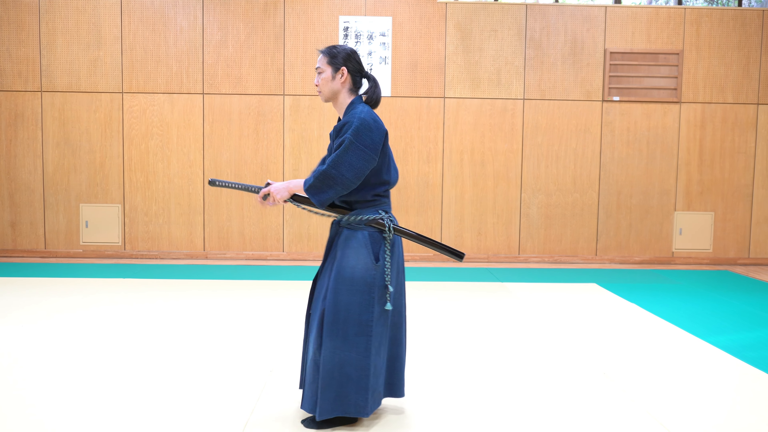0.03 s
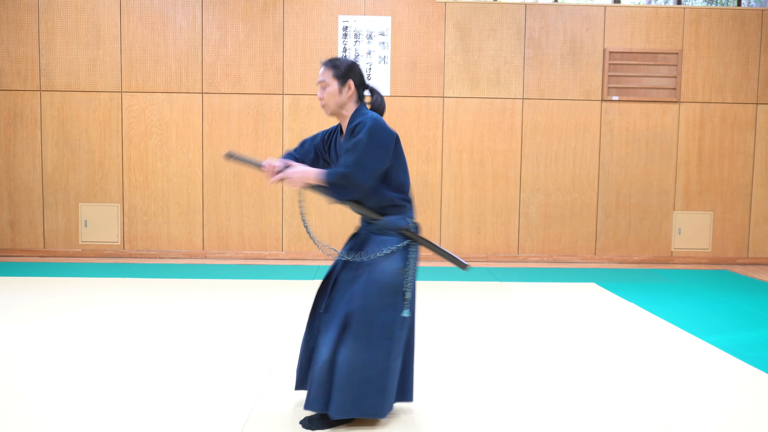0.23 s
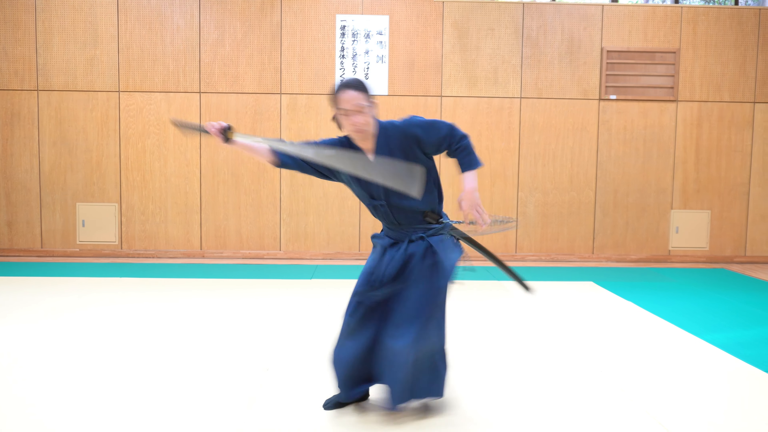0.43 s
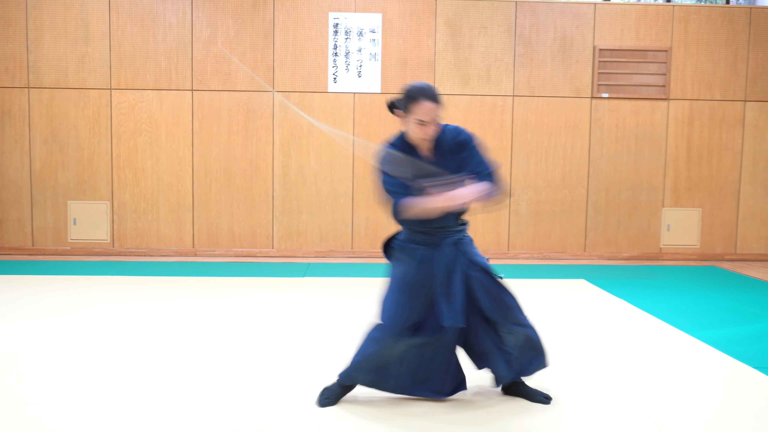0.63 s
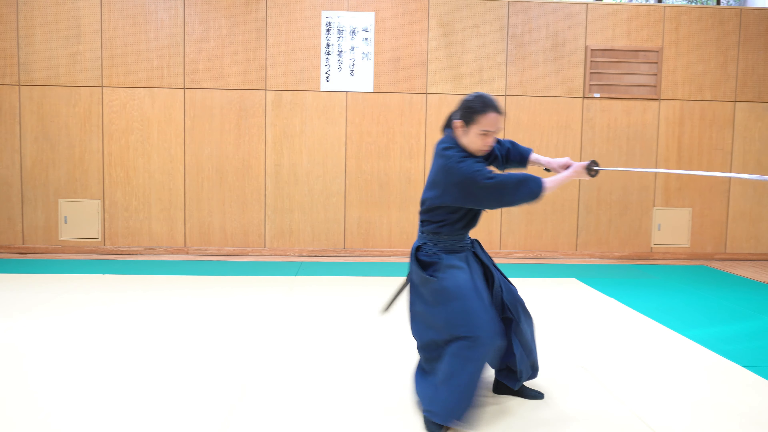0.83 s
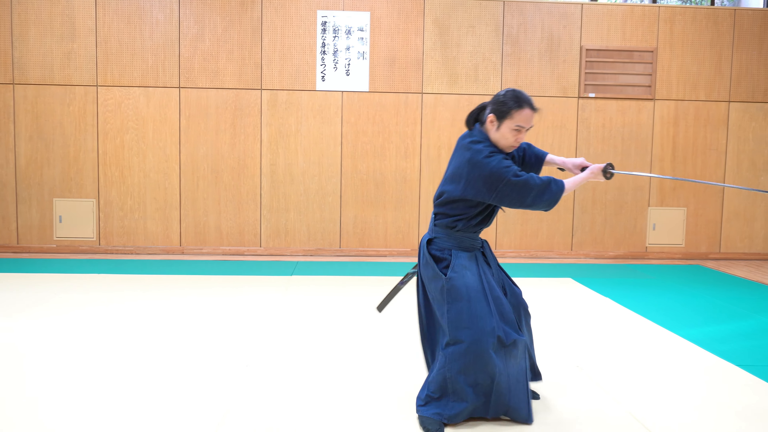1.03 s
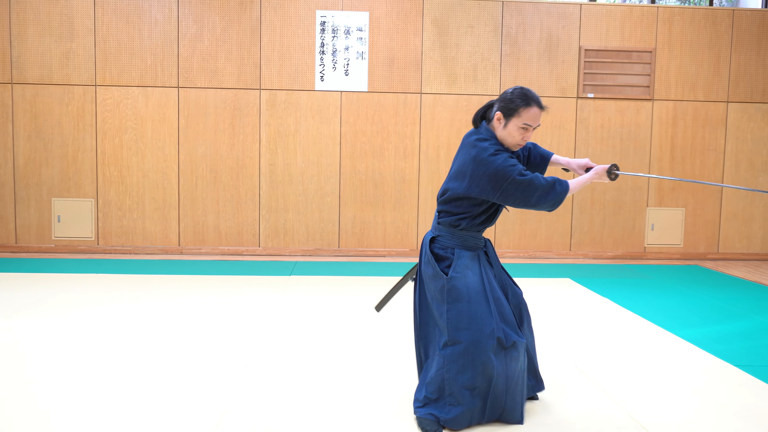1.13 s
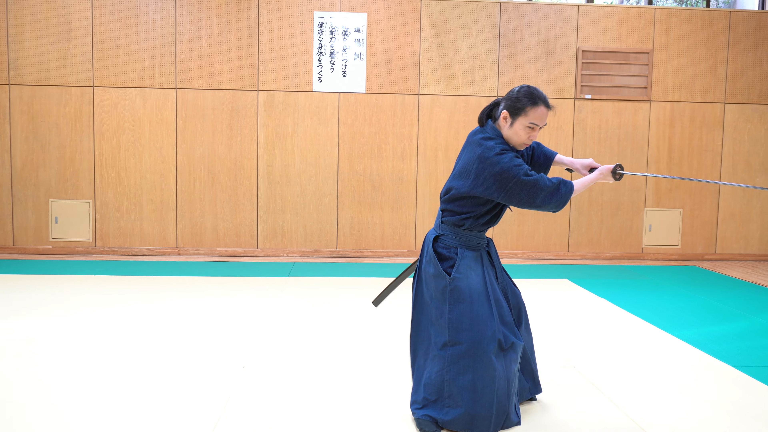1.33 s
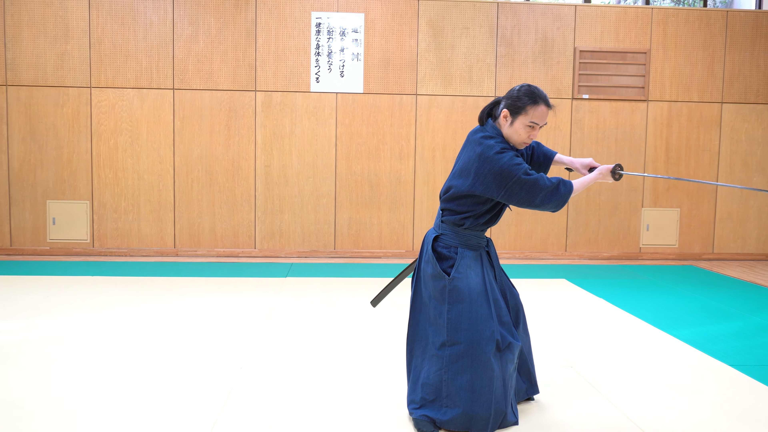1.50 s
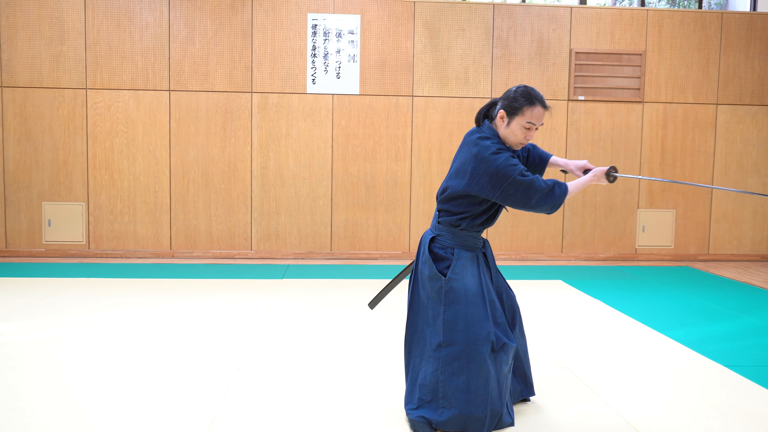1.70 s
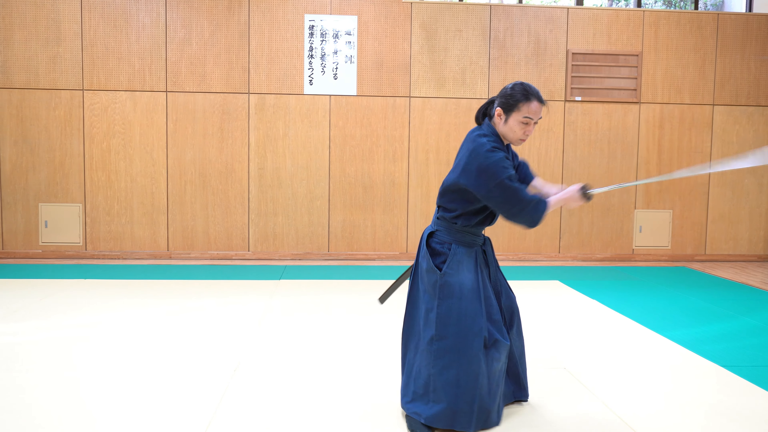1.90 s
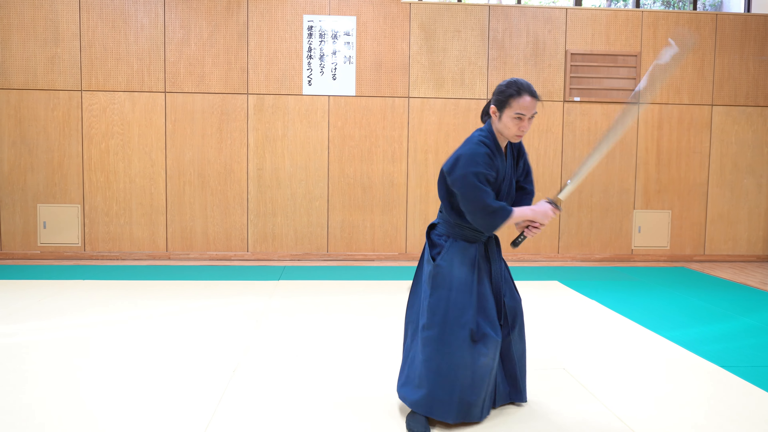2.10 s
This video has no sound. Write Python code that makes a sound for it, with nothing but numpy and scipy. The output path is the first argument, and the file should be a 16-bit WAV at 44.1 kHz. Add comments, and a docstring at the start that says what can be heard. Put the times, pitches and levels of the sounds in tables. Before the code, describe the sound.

A sword is drawn with quick clacks and a scrape, then swishes through the air. Feet thud and skid on a mat while heavy clothing sweeps round and settles, leaving the steady ventilation hum of a slightly echoing hall.

```python
"""Ventilation hums steadily in a quiet hall. A sword is drawn: its fittings click, and the blade clacks
and scrapes, exciting the resonances of steel and wooden scabbard. Feet begin to thud on the sprung floor.
The freed blade rings faintly and swishes once, while the emptying scabbard sounds a falling tone.
With sharp slaps the person turns: a foot skids on the mat, and heavy cloth sweeps round and settles.
The hall reverberates for about a second."""
import sys
import numpy as np
from scipy import signal
from scipy.fft import rfft, irfft, next_fast_len
from scipy.io import wavfile
from scipy.ndimage import map_coordinates

SR = 44100
rng = np.random.default_rng(int(sys.argv[2]) if len(sys.argv) > 2 else 0)


def bounce(signal):
    """Save signal as a 16-bit WAV file at the path given by the first command-line argument."""
    frames = np.transpose(np.atleast_2d(signal))
    limited = np.clip(frames, -1, 1)
    pcm = np.round(limited * 32767).astype(np.int16)
    wavfile.write(sys.argv[1], SR, pcm)


N = 94815
T = np.arange(N) / SR


def amp(db):
    """Decibels to amplitude ratio."""
    return 10 ** (np.asarray(db) / 20)


def unit(x):
    """Normalisation to rms 1."""
    return x / np.sqrt(np.mean(x ** 2) + 1e-20)


def along(points, hz):
    """Interpolation of (Hz, value) points on a logarithmic frequency axis."""
    freqs, values = np.transpose(points)
    return np.interp(np.log(hz + 1), np.log(freqs + 1), values)


def wobble(rate):
    """Smooth random modulation, with rate knots a second."""
    return map_coordinates(rng.standard_normal(int(N * rate / SR) + 4), [T * rate])


def filtered(x, response):
    """Linear filtering: the spectrum is multiplied by a frequency response."""
    size = x.shape[-1]
    padded = 2 * next_fast_len(size)
    return irfft(rfft(x, padded) * response(np.fft.rfftfreq(padded, 1 / SR)), padded)[..., :size]


def minimum_phase(tone):
    """Folding the cepstrum gives a causal response with the given spectrum."""
    def response(hz):
        cepstrum = irfft(np.log(amp(along(tone, hz))))
        size = len(cepstrum)
        return np.exp(rfft(np.r_[cepstrum[0], 2 * cepstrum[1:size // 2]], size))
    return response


def resonator(modes):
    """Modal superposition: a body responds as a sum of damped resonances."""
    return lambda f: sum(amp(db) * 1j * f * width / (hz * hz - f * f + 1j * f * width)
                         for hz, width, db in modes)


def noise(tone):
    """Spectral shaping of two independent white noises."""
    return unit(filtered(rng.standard_normal((2, N)), lambda hz: amp(along(tone, hz))))


def spread(pair, correlation):
    """Mid-side mixing gives two independent signals a set left-right correlation."""
    def weights(hz):
        angle = np.arccos(np.clip(along(correlation, hz), -1, 1)) / 2
        return np.array([np.cos(angle), np.sin(angle)])
    mid, side = filtered(pair, weights)
    return np.array([mid + side, mid - side])


# Direct sound. Each row: frequency in Hz, left-right correlation.
DIRECT_FIELD = [(250, 1), (700, 0.99), (2000, 0.91), (5000, 0.56), (15000, 0.66)]
def near(pair):
    """Direct sound is much alike on both sides, so its image is narrow."""
    return spread(pair, DIRECT_FIELD)


def swell(rows):
    """Incoherent addition: the envelopes of the movements sum in power."""
    power = 0
    for s, db, rise, fall in rows:
        decay = np.where(T < s, ((T - s) / rise) ** 2, np.abs((T - s) / fall) ** 1.8)
        power += amp(db) ** 2 * np.exp(-2 * decay)
    return np.sqrt(power)


def strokes(rows, tone, grain_db):
    """Amplitude modulation: noise follows the movements, with a fast flutter as its grain."""
    return near(swell(rows) * unit(noise(tone) * amp(grain_db * wobble(300))))


# Diffuse sound. Each row: frequency in Hz, left-right correlation.
DIFFUSE_FIELD = [(60, .9999), (150, 1), (380, 0.98), (950, 0.76), (2400, 0.24), (6000, 0.067),
                 (15000, 0.24)]
# Decay of the hall. Each row: frequency in Hz, reverberation time in seconds.
HALL_T60 = [(100, 1), (500, 0.62), (2000, 1), (4000, 0.84), (8000, 0.55), (15000, 0.45)]
# Colour of its tail. Each row: frequency in Hz, gain in dB.
HALL_SPECTRUM = [(100, 4), (600, 4.5), (2000, 0), (5000, -4.5), (10000, -3.5), (16000, 4.5)]
def in_hall(x, wet_db, build_s=0.0091):
    """Reverberation: a diffuse tail builds up and decays exponentially, the treble first."""
    hz, t, spectra = signal.stft(rng.standard_normal((2, SR)), SR, nperseg=256)
    decay = amp(along(HALL_SPECTRUM, hz)[:, None] - 60 * t / along(HALL_T60, hz)[:, None])
    onset = 1 - np.exp(-t / build_s)
    tail = spread(signal.istft(spectra * decay * onset, SR, nperseg=256)[1], DIFFUSE_FIELD)
    tail /= np.linalg.norm(tail[0])
    return x + amp(wet_db) * signal.fftconvolve(x.mean(0)[None], tail, axes=1)[:, :N]


# Moving air. Each row: frequency in Hz, relative level in dB.
AIR_SPECTRUM = [(10, -39), (25, -16), (40, 3), (60, -4.5), (90, 0.5), (135, -0.5), (160, -7.5), (200, -3),
                (320, -6), (450, -3.5), (720, -7), (950, -10.5), (1400, -14), (2000, -18.5), (3300, -29),
                (4600, -37), (8000, -43), (15800, -47.5)]
# Fan tones. Each row: frequency in Hz, rms level in dB.
FAN_TONES = [(96.9, -54.5), (192.5, -51.5), (425.3, -54.5), (502, -52)]
def ventilation(air_db=-38):
    """Dull broadband air noise forms a diffuse field; the fan tones waver in phase."""
    hum = sum(amp(db) * np.sqrt(2) * np.sin(2 * np.pi * hz * T + 0.65 * wobble(6.95))
              for hz, db in FAN_TONES)
    return amp(air_db) * spread(noise(AIR_SPECTRUM), DIFFUSE_FIELD) + hum


# Blade rubbing in the scabbard's mouth. Each row: time in seconds, level in dB.
SCRAPE_LEVELS = [(.24, -31), (.262, -33.5), (.31, -31), (.35, -32.5), (.37, -33.5), (.41, -28.5),
                 (.445, -28), (.49, -29.5), (.53, -29.5), (.56, -33), (.585, -31.5), (.61, -41), (.65, -38),
                 (.68, -83)]
# Its friction. Each row: frequency in Hz, relative level in dB.
SCRAPE_SPECTRUM = [(150, -8), (300, 0), (420, -9.5), (620, -3), (850, -2), (1300, -1.5), (1800, -3),
                   (2400, -2.5), (4000, -6.5), (7000, -16.5), (10000, -25), (16000, -36)]
# Scabbard resonances. Each row: frequency in Hz, bandwidth in Hz, gain in dB.
SCABBARD_MODES = [(690, 160, -11.5), (1219, 69, 0), (1420, 98, -8), (1610, 79, -5), (1836, 75, 4.5),
                  (2080, 70, -1.5), (2272, 71, 1), (2653, 65, -1), (3070, 66, -2), (3565, 33, -1.5),
                  (4645, 43, -10), (5180, 40, -22)]
def scrape(ring_db=-19.5):
    """Sliding friction makes grainy noise that weakly drives the scabbard's modes."""
    level = amp(np.interp(T, *np.transpose(SCRAPE_LEVELS), left=-120, right=-120))
    friction = noise(SCRAPE_SPECTRUM) * amp(1.8 * wobble(400))
    ring = unit(filtered(friction, resonator(SCABBARD_MODES)))
    return level * near(unit(friction) + amp(ring_db) * ring)


def chatter(envelope, first_contact_db=12.5):
    """Broadband excitation: an impulse at first contact, then a brief rattle."""
    force = envelope * rng.standard_normal((2, len(envelope)))
    force[0, 0] += amp(first_contact_db)
    for _ in range(4):  # flatten the spectrum, then confine it in time again
        spectrum = rfft(force)
        force = irfft(spectrum / (np.abs(spectrum) + 1e-12), len(envelope)) * np.sqrt(envelope)
    return near(force)


# Resonances of scabbard mouth and steel fittings. Each row: frequency in Hz, bandwidth in Hz, gain in dB.
MOUTH_MODES = [(995, 80, -15.5), (1778, 80, -1.5), (4800, 92, -19)]
STEEL_MODES = [(2020, 230, 1), (2270, 230, 6), (2670, 220, 5), (3570, 82, -4), (3900, 100, -10),
               (5070, 200, 4.5), (5630, 140, -14), (7100, 120, -20), (7500, 96, -12), (9000, 100, -17),
               (10550, 110, -29)]
# Crack of contact. Each row: frequency in Hz, relative level in dB.
CRACK_SPECTRUM = [(100, -16), (350, 1.5), (750, 8), (1300, 4.5), (2500, -2), (5000, 0.5), (8500, -8.5),
                  (11000, -28), (16000, 1)]
# Knocks of blade and fittings. Each row: start in seconds, level in dB, chatter length in seconds,
# gains of scabbard, mouth, steel and crack in dB, left minus right in dB.
KNOCKS = [(0.2407, -28, 0.0016, -18, -11, -8, 0, 0), (.2484, -20.5, 0.0013, -8, -14, -8, -4.5, 0),
          (0.252, -27.5, 0.0058, -8, -14, -13, 0, 0), (0.283, -19, 0.00307, -10.5, -21, -8, -5.5, 0.5),
          (0.2892, -29, .005, -14, -8, -8, -4, 4), (0.324, -34, .002, -12, -19, -8, -2, 5),
          (0.3756, -26.5, 0.0025, -11, 6, -21, -14, -2), (0.3776, -14.5, 0.0009, -19, -1.5, -18, -16, 1),
          (0.389, -15.5, .003, -24, -18, 1.5, -9.5, 0.5), (0.4487, -20, 0.00152, 3.5, -9, -32, -17, -4),
          (0.452, -15, 0.00283, 0.5, -11, -30, -32, 5), (0.4576, -13, .003, -3, -17, -23, -10.5, -4)]
def clacks(chatter_t60_s=0.0077):
    """Impact excitation: each chattering contact cracks and sets scabbard and steel ringing."""
    out, t = np.zeros((2, N)), T[:SR // 10]
    parts = [resonator(modes) for modes in (SCABBARD_MODES, MOUTH_MODES, STEEL_MODES)]
    parts.append(minimum_phase(CRACK_SPECTRUM))
    for s, db, length, *part_dbs, pan_db in KNOCKS:
        envelope = amp(-60 * np.maximum(t - length, 0) / chatter_t60_s)
        force = chatter(envelope)
        knock = sum(amp(part_db) * unit(filtered(force, part)) for part, part_db in zip(parts, part_dbs))
        sides = amp(db + np.array([[pan_db], [-pan_db]]) / 2)
        out[:, round(s * SR):][:, :len(t)] += sides * np.sqrt(np.mean(envelope ** 2)) * knock
    return out


# Floor rumble. Each row: peak time in seconds, level in dB, rise and fall in seconds.
FLOOR_RUMBLES = [(.42, -45, 0.097, 0.14), (.70, -34, 0.046, .06), (.79, -32.5, 0.054, 0.073),
                 (.98, -42.5, 0.072, 0.069)]
# Its colour. Each row: frequency in Hz, relative level in dB.
RUMBLE_SPECTRUM = [(10, -32), (25, 3), (45, -10.5), (110, -7.5), (165, -13), (250, -1), (450, -31),
                   (1500, -55), (8000, -86)]
# Weight landing. Each row: start in seconds, level in dB, frequency in Hz.
FLOOR_THUDS = [(.405, -23, 99.4), (.625, -25.5, 50.4), (.679, -18.5, 117.5), (0.746, -21, 75),
               (.772, -22.5, 117.4), (0.789, -21, 45.6), (0.816, -26, 78), (0.857, -19, 47),
               (0.878, -22.5, 69), (.94, -24.5, 46.6), (1.018, -44, 101)]
def footfalls(t60_s=0.15, attack_s=0.0036):
    """The sprung floor is a damped oscillator: it thuds under weight and rumbles as the feet move."""
    out = strokes(FLOOR_RUMBLES, RUMBLE_SPECTRUM, grain_db=1.5)
    for s, db, hz in FLOOR_THUDS:
        age = np.maximum(T - s, 0)
        envelope = amp(db - 60 * age / t60_s) * (1 - np.exp(-age / attack_s))
        out += envelope * np.sin(2 * np.pi * hz * age)
    return out


# Partials of the blade. Each row: frequency in Hz, initial level in dB.
BLADE_MODES = [(1365, -36), (1655, -36.5), (1850, -31), (2283, -37)]
def blade_ring(free_s=0.459, t60_s=0.91):
    """Free vibration: the released blade's modes decay exponentially, wavering in phase."""
    age = np.maximum(T - free_s, 0)
    ring = sum(amp(db - 60 * age / t60_s) * np.sin(2 * np.pi * hz * age + 0.64 * wobble(40.2))
               for hz, db in BLADE_MODES)
    return ring * (age > 0)


# The emptying scabbard. Each row: peak time in seconds, level in dB, rise and fall in seconds.
COLUMN_SWELL = [(.555, -32.5, .06, 0.057)]
def air_column(hz_at_peak=1880, fall_hz_per_s=2600, width_hz=150):
    """The resonance of the scabbard's air column falls as the blade leaves it."""
    hz = hz_at_peak - fall_hz_per_s * (T - COLUMN_SWELL[0][0])
    phase = 2 * np.pi * np.cumsum(hz) / SR
    band = [wobble(width_hz) * np.sin(phase) + wobble(width_hz) * np.cos(phase) for _ in range(2)]
    return swell(COLUMN_SWELL) * unit(near(np.array(band)))


# The blade whips clear. Each row: peak time in seconds, level in dB, rise and fall in seconds.
SWISH_SWELLS = [(.535, -26, 0.019, 0.033), (.59, -33, .02, 0.027)]
# Its whistle. Each row: frequency in Hz, bandwidth in Hz, gain in dB.
WHISTLE_BANDS = [(593, 12, 15), (1380, 64, 6), (2230, 39, -17), (3350, 120, -17)]
def swish():
    """Narrow-band noise gives the moving blade a hollow whistle."""
    whistle = filtered(rng.standard_normal((2, N)), resonator(WHISTLE_BANDS))
    return swell(SWISH_SWELLS) * unit(near(whistle))


# The turn begins. Each row: peak time in seconds, level in dB, rise and fall in seconds.
SLAP_BURSTS = [(.6525, -17, 0.00067, 0.0037), (.6562, -22, 0.00074, .004), (.666, -27, 0.0045, 0.015)]
# Their colour. Each row: frequency in Hz, relative level in dB.
SLAP_SPECTRUM = [(100, -25), (370, 4.5), (550, -2), (850, 1), (1400, -4), (2400, -5.5), (4000, -8.5),
                 (8000, -17.5), (12000, -25), (16000, -23)]
def slaps():
    """Broadband transients: noise bursts lasting milliseconds are heard as sharp slaps."""
    return strokes(SLAP_BURSTS, SLAP_SPECTRUM, grain_db=-0.5)


# A foot slides. Each row: peak time in seconds, level in dB, rise and fall in seconds.
SKID_STROKES = [(.696, -26.5, 0.016, 0.041), (.715, -40, .02, 0.037)]
# Their colour. Each row: frequency in Hz, relative level in dB.
SKID_SPECTRUM = [(200, 1), (500, 1), (900, -9), (2000, 2), (3500, 0), (6000, -3.5), (8000, 1.5),
                 (10500, -5.5), (13500, -9), (16000, -19)]
def skid():
    """Sliding friction between foot and mat makes a bright hiss."""
    return strokes(SKID_STROKES, SKID_SPECTRUM, grain_db=1.0)


# Cloth and feet in the turn. Each row: peak time in seconds, level in dB, rise and fall in seconds.
SWEEP_STROKES = [(.815, -28.5, 0.073, 0.091), (.878, -31, 0.063, 0.04)]
# Their colour. Each row: frequency in Hz, relative level in dB.
SWEEP_SPECTRUM = [(200, -9.5), (800, -10.5), (1500, -3), (2500, 5), (4000, -2.5), (6000, -5), (8500, -10.5),
                  (13000, -16.5), (16000, -28)]
def sweep():
    """Friction noise swells and fades as cloth and feet sweep round."""
    return strokes(SWEEP_STROKES, SWEEP_SPECTRUM, grain_db=1.0)


# Wide trousers settle. Each row: peak time in seconds, level in dB, rise and fall in seconds.
SETTLE_STROKES = [(.91, -30.5, 0.068, 0.094), (1.0, -45, .05, 0.11)]
# Their colour. Each row: frequency in Hz, relative level in dB.
SETTLE_SPECTRUM = [(150, -6.5), (400, -5), (800, -6), (1400, 2), (2200, -3.5), (3500, -7), (6000, -18.5),
                   (16000, -38)]
def settle():
    """Duller friction noise dies away as the cloth comes to rest."""
    return strokes(SETTLE_STROKES, SETTLE_SPECTRUM, grain_db=0.0)


def scene():
    """Superposition: the draw and the turn, with their reverberation, add to the ventilation."""
    slightly_right = amp([[-0.6], [0.6]])
    return (ventilation()
            + in_hall(scrape() + blade_ring(), wet_db=-7) * slightly_right
            + in_hall(clacks(), wet_db=-2)
            + in_hall(footfalls(), wet_db=-13.5)
            + in_hall(air_column(), wet_db=-5.5) * slightly_right
            + in_hall(slaps(), wet_db=-6.5)
            + in_hall(swish() + skid() + sweep() + settle(), wet_db=-7.5))


def record(dry, top_hz=16150, edge_hz=400):
    """Band limiting: a steep low-pass removes the highest treble."""
    return filtered(dry, lambda hz: np.clip((top_hz - hz) / edge_hz, 0, 1))


dry = scene()
out = record(dry)
bounce(out)
```